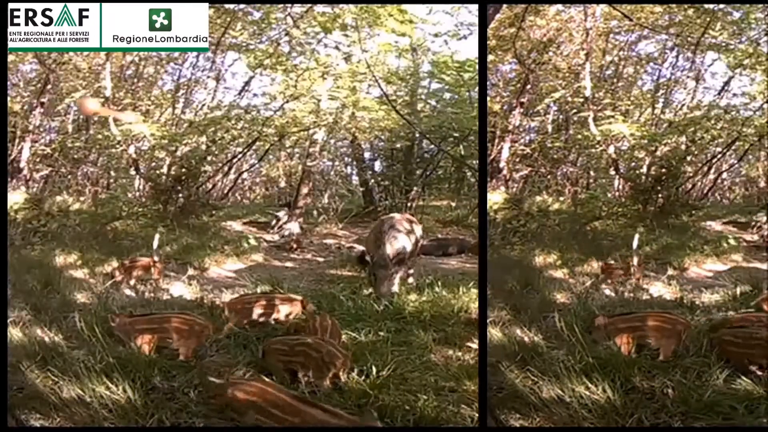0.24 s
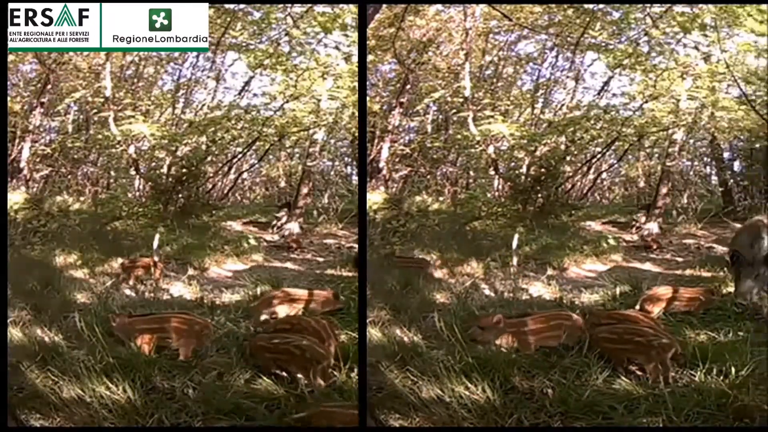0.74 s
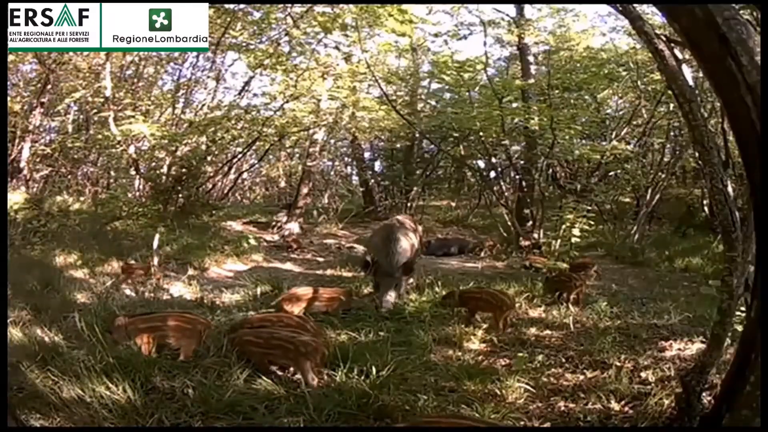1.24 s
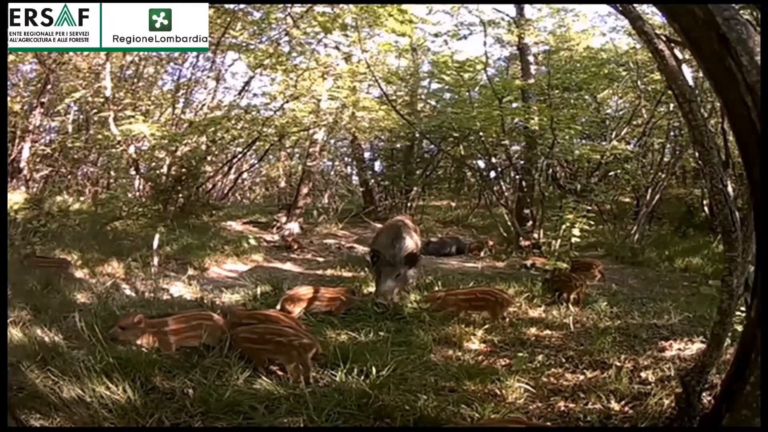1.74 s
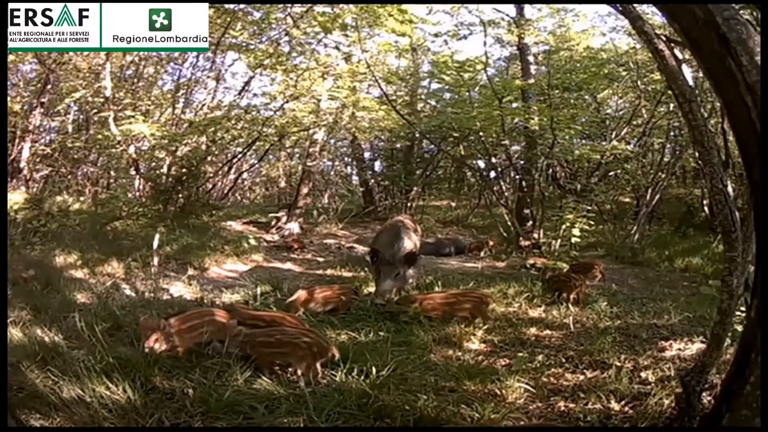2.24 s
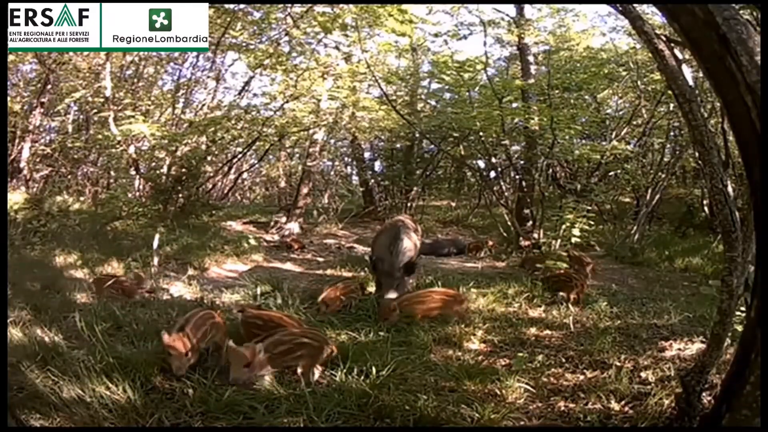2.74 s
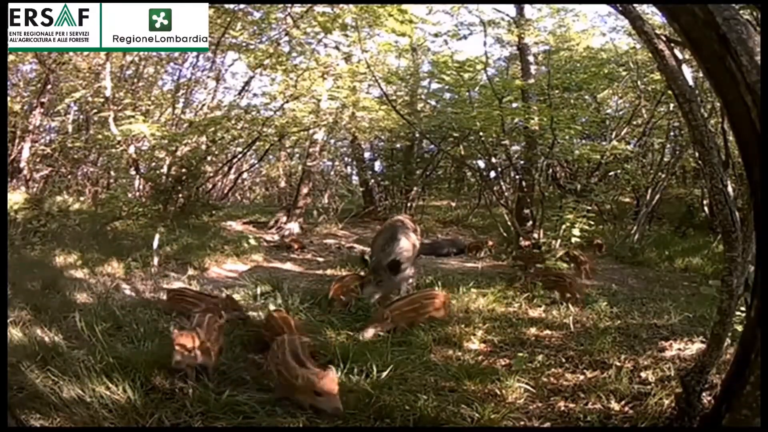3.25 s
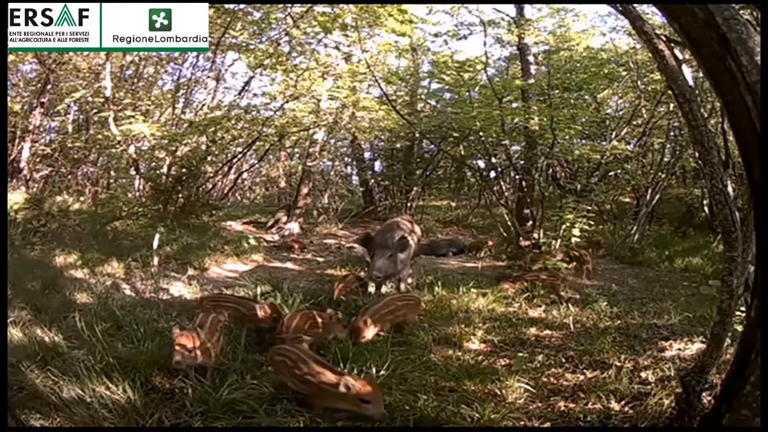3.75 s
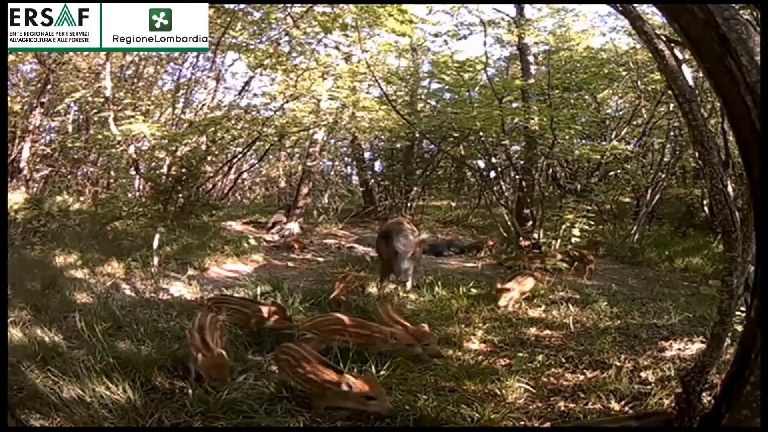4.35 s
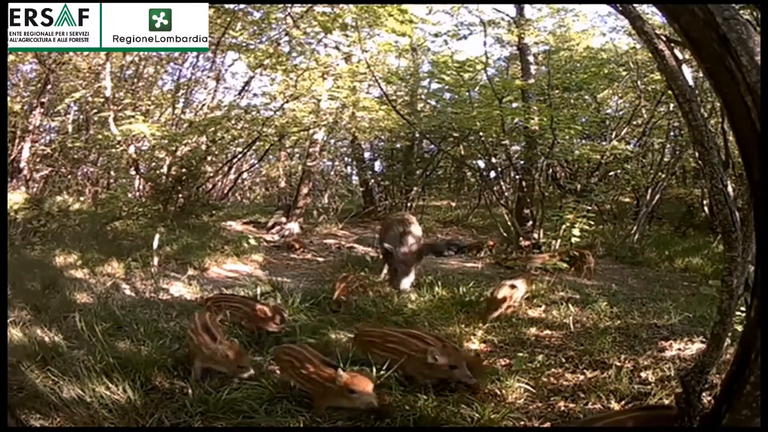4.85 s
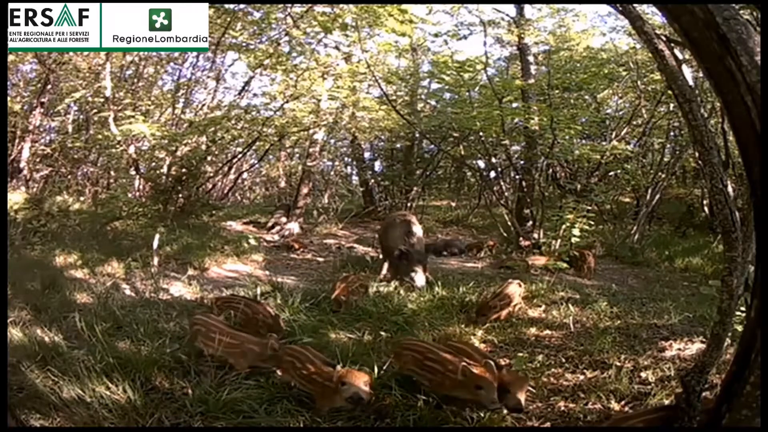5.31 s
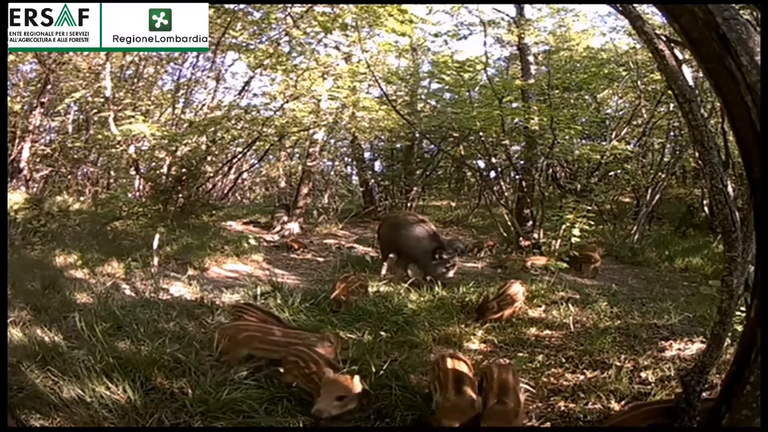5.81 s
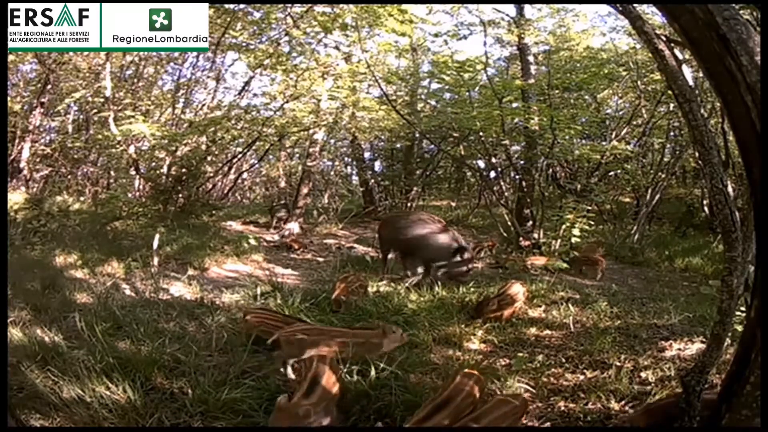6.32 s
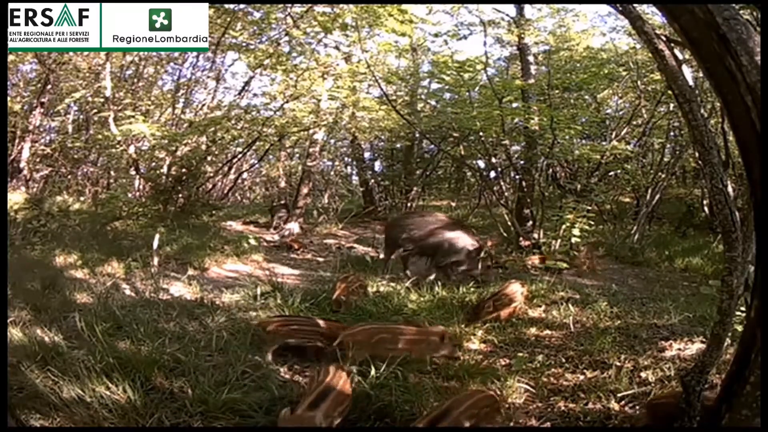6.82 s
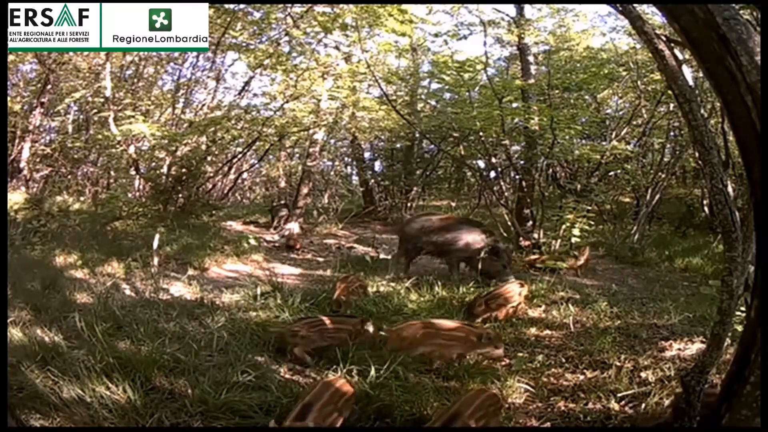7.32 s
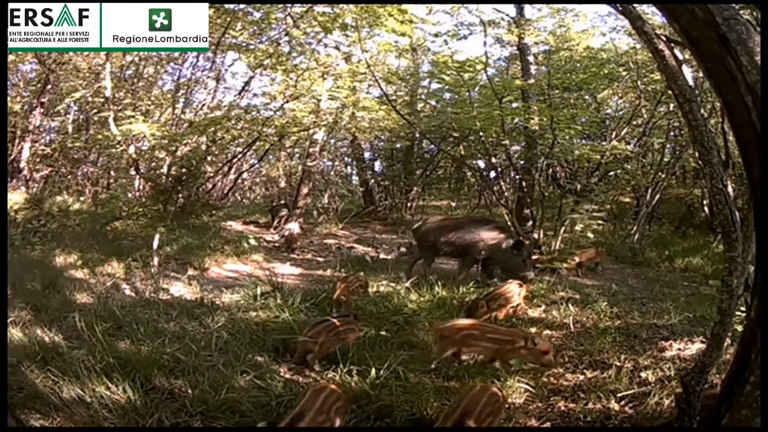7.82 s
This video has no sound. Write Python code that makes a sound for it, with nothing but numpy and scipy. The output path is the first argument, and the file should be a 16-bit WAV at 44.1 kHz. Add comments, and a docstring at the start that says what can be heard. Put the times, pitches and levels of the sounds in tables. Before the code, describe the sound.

A microphone switches on with a loud thump at about 0.1 seconds, followed by quick small ticks as a faint hiss swells in. From 0.4 seconds, wild boar piglets and a sow root through grass and dry leaves in a wood, making crisp, uneven swells of crackle with many small stalk snaps and light hoof steps. Soft, short snorts and lip smacks are scattered between 0.7 and 4.4 seconds, and the sow gives one brief low grunt at 1.3 seconds. A distant bird whistles four faint high notes from 4.5 to 4.7 seconds. The sharpest snap comes at about 4.9 seconds, with a small crunch of leaves. The rustling and snapping continue until the end at about 8 seconds, with another smack or two and a few faint snorts from 6.6 seconds. Light, low wind on the microphone lies underneath.

```python
"""In a wood, wild boar piglets and a sow root through grass and dry leaves before a small fixed camera.
The litter breaks in countless tiny impulses that merge into swells of crackle; stalks snap and ring.
Snouts snort, lips smack and the sow grunts, over faint bird notes, hiss and wind on the microphone.
The camera switches on with a thump of offset voltage, and its gain steps tick as the hiss swells back."""
import sys
import numpy as np
from scipy import signal
from scipy.io import wavfile
from scipy.ndimage import uniform_filter1d

SR = 44100
rng = np.random.default_rng(int(sys.argv[2]) if len(sys.argv) > 2 else 0)


def to_wav(sig):
    """Store sig (one row per channel, or 1-D mono) as 16-bit WAV at the path in sys.argv[1].

    Samples outside -1..1 are clipped; the rate is SR.
    """
    pcm = np.clip(np.atleast_2d(sig), -1, 1) * 32767
    pcm = np.round(pcm).astype(np.int16)
    wavfile.write(sys.argv[1], SR, pcm.T)  # frames by channels


N = 355887
T = np.arange(N) / SR
MUTE_S = .081  # a duller hiss gives way to near silence here, just before the thump
# coarse steps of the gain: their count grows with the square of time, so they crowd ever closer
COARSE_STEPS_S = .083 + np.sqrt(.008454 * (.57 + np.arange(14)))


def undb(db):
    """Decibels to amplitude ratio."""
    return 10 ** (np.asarray(db) / 20)


def unit(x):
    """Normalisation to an rms of 1."""
    return x / np.sqrt(np.mean(x ** 2))


def band(x, hz, width_hz):
    """Resonance as a fourth-order band-pass about a geometric centre."""
    low = np.sqrt(hz ** 2 + width_hz ** 2 / 4) - width_hz / 2
    edges = [low, min(low + width_hz, .45 * SR)]
    return signal.sosfilt(signal.butter(2, edges, "band", fs=SR, output="sos"), x)


def flicker(rate):
    """Random modulation of rms 1: values held for 1 / rate seconds and smoothed twice."""
    hold = int(SR / rate)
    held = np.repeat(rng.standard_normal(N // hold + 1), hold)
    return unit(uniform_filter1d(uniform_filter1d(held, hold), hold)[:N])


def add(out, start_s, sound):
    """Superposition of a short sound on a longer one."""
    i = int(start_s * SR)
    out[i:i + len(sound)] += sound[:N - i]


def crackle(rate, spread_db):
    """Poisson impulses, rate per second, with heavy-tailed sizes: most small, a few large."""
    out = 1. * (rng.random(N) < rate / SR)
    count = N // 6
    sizes = rng.standard_normal(count) * undb(spread_db * np.minimum(rng.exponential(size=count), 5))
    out[out > 0] = sizes[:int(out.sum())]
    return unit(out)


def rustle(dip_db):
    """Shot noise of cracking leaves: some impulses excite every third-octave band, others one alone."""
    # spectrum of the leaf noise: (frequency [Hz], band gain [dB])
    spectrum = [(950, -10.5), (1350, -10), (1900, -3.5), (2700, 1.5), (3600, 5), (4800, -5.5), (6500, -2),
                (8500, -1), (11000, -4.5), (13500, 3.5), (15500, -11)]
    spectrum_hz, spectrum_db = np.transpose(spectrum)
    leaf_db, litter_db, grass_db = rooting_levels()
    leaf, litter, grass = undb(leaf_db), undb(litter_db + dip_db), undb(grass_db)
    broadband = crackle(rate=3000, spread_db=1.5) * undb(.52 * flicker(56) + 1.8 * flicker(220))
    cracks = 0
    for hz in 950 * 2 ** np.arange(0, 4.1, 1 / 3):
        own = crackle(rate=4000, spread_db=2.1) * undb(2.4 * flicker(60))
        envelope = litter if hz < 4000 else grass if hz > 10000 else leaf
        colour = undb(np.interp(np.log(hz), np.log(spectrum_hz), spectrum_db))
        cracks += colour * envelope * band(broadband + .99 * own, hz, hz / 3.67)
    stem_ticks = leaf * unit(band(crackle(rate=260, spread_db=3.5), 8000, 10400))
    return (undb(5) * cracks + undb(-10.5) * stem_ticks) * undb(hoof_lift() + .54 * flicker(45))


def rooting_levels():
    """Incoherent sources add in power: envelopes in dB of leaves, heavy litter and fine grass."""
    # steady rooting of the whole group: (time [s], leaf level [dB])
    rooting = [(.17, -66), (.33, -63), (.43, -50), (.68, -59), (.95, -42.5), (1.25, -50), (1.6, -43.5),
               (2.1, -52), (2.7, -67), (3.2, -41.5), (3.45, -50), (3.7, -47.5), (4.3, -42.5), (4.72, -46.5),
               (5.1, -44), (6.2, -43), (7.45, -49), (7.9, -51)]
    # one animal shoves through the leaves: (peak time [s], leaf level [dB], rise per 10 dB [ms],
    # fall per 10 dB [ms], litter re leaves [dB], grass re leaves [dB])
    shoves = [(0.269, -50, 48, 20, -8, -2), (0.383, -40, 25, 44, -8, -5), (0.462, -38, 8.9, 12, -11, 1),
              (0.595, -38, 150, 24, -10.5, -2), (0.732, -38, 22, 76, -9, -4), (0.781, -38, 27, 10, -5, 0),
              (0.876, -39.5, 51, 11, -7, -7), (0.966, -47.5, 10, 280, -3, -2),
              (1.177, -32.5, 57, 13, -28, -2), (1.368, -36.5, 18, 55, -6, -5),
              (1.483, -37, 37, 42, -6.5, -2), (1.631, -52, 38, 24, -11, -4),
              (1.902, -34, 170, 210, -10.5, -6), (2.156, -38.5, 68, 45, -11.5, -2),
              (2.492, -40.0, 290, 140, -12, -3.5), (2.625, -45.5, 10, 76, -23, 2),
              (2.918, -38.0, 320, 19, -11.5, -3), (2.992, -33, 36, 41, -12, -4),
              (3.076, -39, 15, 12, -20, -2), (3.298, -39.5, 18, 34, -16, -2),
              (3.512, -40, 14, 230, -12.5, -6), (3.786, -36, 47, 13, -8, -13),
              (3.912, -35.5, 12, 96, -12, -2), (4.087, -42, 12, 44, -14, -1), (4.332, -39, 22, 10, -11, -7),
              (4.423, -37, 43, 53, -12, -7), (4.662, -43.5, 180, 9.3, -25, 1), (4.774, -39, 30, 15, -25, 1),
              (4.862, -34, 19, 60, -16, -1.5), (4.937, -39, 19, 110, -14, 0),
              (5.304, -38.5, 124, 42, -10.5, 0), (5.477, -35.5, 24, 26, -10.5, -3),
              (5.681, -33.5, 50, 76, -7.5, -1), (6.049, -34, 89, 15, -8.5, -6),
              (6.176, -38, 48, 60, -9.5, -1), (6.407, -42, 510, 97, -12, -5.5),
              (6.508, -39.5, 11, 11, -18, -7), (6.56, -35.5, 10, 11, -14, -5),
              (6.631, -39.5, 11, 39, -7, -6), (6.747, -37, 120, 96, -7, -4),
              (6.834, -39, 30, 200, -8.5, -5), (7.108, -37, 61, 56, -9, -4),
              (7.233, -40.5, 44, 160, -25, -12), (7.534, -36, 50, 145, -9, -5.5),
              (7.996, -40.5, 68, 25, -16, -5)]
    steady_db = np.interp(T, *np.transpose(rooting))
    power = undb(steady_db + np.array([[0], [-11.5], [-3]])) ** 2  # leaves, litter, grass
    for peak_s, db, rise_ms, fall_ms, litter_db, grass_db in shoves:
        rise, fall = rise_ms / 1000, fall_ms / 1000
        near = slice(max(int((peak_s - 4 * rise) * SR), 0), int((peak_s + 4 * fall) * SR))
        t = T[near] - peak_s
        shove_db = db - 10 * np.where(t < 0, -t / rise, t / fall)
        power[:, near] += undb(shove_db + np.array([[0], [litter_db], [grass_db]])) ** 2
    return 10 * np.log10(power)


def hoof_lift():
    """Impact of a hoof in the litter: the crackle's level in dB jumps, then falls as a half Gaussian."""
    # footfalls: (time [s], lift [dB], decay [s])
    footfalls = [(0.38, 4.5, 0.0092), (.459, 4, 0.013), (.586, 3, 0.014), (.7232, 11, 0.013),
                 (0.773, 5, 0.014), (.856, 4, .015), (1.117, 3.5, 0.0069), (1.648, 7, 0.023),
                 (2.222, 3, 0.009), (3.074, 4.5, .008), (3.908, 1, .03), (4.087, 6.5, 0.0093),
                 (4.864, 4, 0.012), (6.502, 5.5, 0.012), (7.8115, 7, .005), (7.9075, 6, 0.03),
                 (7.96, 5, .015)]
    out = np.zeros(N)
    for start, db, decay in footfalls:
        add(out, start, db * np.exp(-(T[:4000] / decay) ** 2))
    return out


def snaps():
    """Brittle fracture excites damped modes: a high ring, a deeper knock of the stem, a crumbling tail."""
    # the loudest stalks and twigs breaking:
    # (time [s], level [dB], ring frequency [Hz], ring length [cycles], knock [Hz], knock re ring [dB])
    loud_breaks = [(0.3813, -24, 9100, 1.6, 2080, -16), (0.3817, -31, 9300, 1.7, 2100, -11),
                   (0.4619, -16.5, 7400, 2.3, 3500, -17), (.5199, -22, 8900, 2, 3500, -12),
                   (0.5402, -26, 8600, 1.5, 2600, -7), (0.589, -19, 7000, 3.4, 3800, -9),
                   (0.7095, -21, 6600, 2.2, 2700, -21), (0.7239, -18, 7700, 1.5, 4100, -9),
                   (0.7269, -18, 11100, 3.8, 3600, -6), (0.731, -14, 13300, 10.0, 3600, 0),
                   (0.8406, -26, 9700, 1.9, 4100, -12), (0.857, -25, 12100, 10.0, 2500, 4),
                   (0.8724, -13.5, 8400, 1.9, 4100, -10), (1.1185, -19, 12900, 1.9, 3400, -16),
                   (1.1193, -25, 5600, 1.5, 3100, -17), (1.14, -23, 9400, 2, 3500, -14),
                   (1.1594, -22, 8400, 2, 3500, -14), (1.2482, -25, 4500, 1.5, 3380, 0),
                   (1.3197, -21, 10000, 4.3, 3000, -3), (1.3585, -25, 9400, 2, 3500, -10),
                   (1.4071, -24, 5200, 1.5, 2800, 3), (1.4162, -25, 5700, 1.5, 3500, -6),
                   (1.4602, -23, 6800, 2, 3500, -10), (1.6194, -10.5, 10000, 6, 3000, -15),
                   (1.6428, -16, 5400, 2, 3020, -6), (1.6438, -34, 6800, 1.5, 3100, -4),
                   (1.7341, -24, 12000, 3.6, 4000, 0), (1.7995, -25, 4900, 1.7, 4000, -3),
                   (2.1447, -25, 5100, 2, 3500, -12), (2.2241, -17, 10500, 3.5, 4100, -16),
                   (2.6294, -21, 8400, 6.1, 3700, -18), (2.7702, -27, 7200, 2, 3500, -14),
                   (2.898, -23, 9500, 2, 3500, -14), (2.9688, -22, 11500, 2, 3500, -14),
                   (3.0749, -15, 8900, 3.0, 4100, -11), (3.0776, -13.5, 12300, 5.2, 4100, -9),
                   (3.0786, -23, 8100, 1.7, 4100, -11), (3.0916, -28, 4500, 1.5, 4100, -4),
                   (3.1786, -22, 8600, 2.9, 2400, -18), (3.3025, -25, 8300, 2, 3500, -10),
                   (3.5021, -29, 12300, 2, 3500, -14), (3.528, -27, 6200, 2, 3500, -14),
                   (3.7817, -16, 6500, 1.5, 4100, -10), (3.7825, -20, 7900, 2.9, 4500, -6),
                   (3.7853, -29, 4730, 3.8, 4100, -10), (3.8323, -25, 8500, 2, 3600, -6),
                   (3.9103, -18, 10100, 6.1, 4100, -8), (3.9466, -14, 10700, 1.7, 4000, -23),
                   (4.0467, -23.5, 5200, 1.6, 4100, -9), (4.0888, -22, 6540, 6.0, 2100, -17),
                   (4.0895, -17, 6700, 12, 4000, -17), (4.0912, -22, 6200, 1.5, 2200, -12),
                   (4.1319, -26, 4600, 1.6, 4100, -6), (4.2304, -19, 10300, 2.8, 3500, -14),
                   (4.3039, -19, 7800, 4.5, 4100, -16), (4.3339, -21, 6100, 1.5, 4100, -6),
                   (4.3634, -25, 9600, 1.9, 3500, -11), (4.3891, -25, 7100, 2, 3500, -12),
                   (4.4215, -14, 12900, 1.5, 3200, -12), (4.4583, -21, 7100, 4.0, 4100, -10),
                   (4.653, -23, 5600, 2, 3800, -10), (4.7697, -18, 8500, 7.6, 2100, -24),
                   (4.8649, -21, 7100, 1.5, 2900, -27), (4.8655, -13, 7200, 10.0, 3100, -18),
                   (4.8711, -14, 7100, 4.0, 4100, -21), (4.8719, -5, 7600, 10, 4100, -27),
                   (4.8743, -26, 7100, 2.1, 4100, -14), (4.8752, -23, 7000, 2.2, 2900, -22),
                   (4.9335, -21, 10600, 2, 3500, -16), (5.2172, -26, 8600, 2, 3500, -14),
                   (5.2385, -18, 9000, 2, 3500, -14), (5.2595, -18, 11000, 2, 3500, -14),
                   (5.3305, -23, 11000, 1.9, 4100, -11), (5.3416, -26, 6300, 1.6, 4100, -14),
                   (5.5454, -24, 4500, 1.6, 4080, -2), (5.7256, -22, 9500, 2.3, 3200, -9),
                   (5.7431, -19, 9600, 7.8, 3800, -11), (5.8037, -15, 11100, 2.5, 4000, -8),
                   (5.835, -19, 6500, 2, 2800, -2), (5.9254, -19, 13500, 4.4, 4130, -4),
                   (5.935, -22, 13500, 3, 4000, -14), (6.03, -17, 6300, 2.5, 2800, -15),
                   (6.3297, -17.5, 5400, 2.3, 4100, -9), (6.393, -20.5, 6530, 5.3, 4100, -19),
                   (6.5043, -27, 6300, 2, 3500, -10), (6.6392, -17, 6900, 1.9, 4100, -6),
                   (6.6626, -23, 11200, 2.6, 3100, 2), (6.8295, -26, 8500, 2, 3500, -12),
                   (6.941, -17, 10200, 2.1, 3400, -11), (7.1377, -18, 7800, 1.5, 3200, -19),
                   (7.2358, -20, 7100, 3.6, 4100, -15), (7.2593, -22, 7100, 9.1, 3600, -20),
                   (7.6099, -20, 6300, 1.8, 2900, -19), (7.6109, -16, 6200, 2.3, 3000, -18),
                   (7.7304, -18, 10800, 4.5, 3700, -19), (7.812, -24, 7320, 3.6, 3200, -9),
                   (7.9081, -31, 4470, 10.0, 4100, -2), (7.9603, -21, 5700, 2, 3600, -3),
                   (7.9961, -18, 8000, 6.8, 3900, 0), (7.9976, -25, 6600, 2.4, 4100, -1),
                   (8.0178, -17.5, 6800, 3.7, 4100, -21), (8.0535, -22.5, 7400, 1.6, 4100, -16)]
    small_times = rng.uniform(.5, T[-1], 50)
    small_breaks = [(start, rng.normal(-27, 2), 8500 * 2 ** rng.normal(0, .25), 2.5, 3200, -10.5)
                    for start in small_times]
    out, t = np.zeros(N), T[:900]
    for start, db, hz, cycles, knock_hz, knock_db in loud_breaks + small_breaks:
        turns = t * hz
        ring = np.sin(2 * np.pi * turns) * (1 - np.exp(-turns / .6)) * np.exp(-3 * turns / cycles)
        ring /= np.abs(ring).max()
        knock = undb(knock_db) * np.sin(2 * np.pi * knock_hz * t) * np.exp(-t * knock_hz / 1.04)
        crumbs = .15 * band(rng.standard_normal(len(t)), hz, 1.3 * hz) * np.exp(-t / .003)
        add(out, start - .00012, undb(db - 4.5) * (ring + knock + crumbs))
    return signal.sosfilt(signal.butter(2, 1700, "high", fs=SR, output="sos"), out)


def crunches():
    """A sudden, dense train of cracks drives the resonance of one size of leaf."""
    # bunches of dry leaves crushed: (time [s], length [s], level [dB], resonance [Hz], bandwidth [Hz])
    bunches = [(0.766, 0.022, -42, 4240, 2500), (1.84, 0.05, -42, 7600, 1200),
               (1.886, 0.03, -39, 5440, 1200), (1.89, 0.017, -39, 7540, 1400),
               (1.927, 0.018, -45, 5200, 800), (2.985, 0.037, -47, 4360, 1200),
               (3.298, .008, -49.5, 3430, 900), (4.866, .018, -34, 7400, 1300),
               (4.877, 0.03, -39, 7800, 1800), (5.631, 0.024, -41, 5900, 1200),
               (5.69, .022, -38, 5970, 1300), (6.006, 0.011, -43, 6350, 900), (6.02, .022, -40, 6300, 1000),
               (7.81, .003, -47, 3280, 1500), (7.91, .008, -47, 4450, 900), (7.93, .014, -46.5, 7050, 1200)]
    out, cracks = np.zeros(N), crackle(rate=2000, spread_db=.5)
    for start, length, db, hz, width_hz in bunches:
        near = slice(int(start * SR), int((start + length + .01) * SR))
        envelope = np.interp(T[near] - start, [0, .001, .7 * length, length], [0, 1, .8, 0])
        out[near] += undb(db) * unit(band(cracks[near] * envelope, hz, width_hz))
    return out


def snorts():
    """Flutter in the nose modulates the amplitude of a snout resonance and its breath noise."""
    # snorts and low grunts:
    # (time [s], level [dB], resonance [Hz], length [s], breathiness [0-1], flutter [Hz])
    breaths = [(0.944, -43, 326, 0.056, 0, 55), (1.083, -51, 219, 0.055, 0.07, 63),
               (1.218, -52, 342, 0.064, 0.1, 67), (1.385, -56, 230, 0.028, .2, 60),
               (1.753, -55, 295, 0.048, 0.04, 33), (1.86, -57, 199, 0.046, 0.25, 67),
               (1.91, -50.5, 338, 0.048, 0, 42), (1.976, -56, 269, 0.048, 0.2, 60),
               (1.804, -52, 338, 0.055, 0.2, 64), (1.881, -50.5, 324, 0.036, 0.37, 79),
               (2.245, -47, 333, 0.036, 0.1, 85), (2.277, -44, 362, 0.024, 0, 19),
               (2.436, -51.5, 702, 0.023, 0.46, 85), (2.54, -56, 297, 0.028, 0, 78),
               (3.488, -41.5, 497, 0.011, 0.06, 98), (3.652, -51, 625, 0.035, 0.26, 70.5),
               (6.645, -56, 330, 0.05, 0.3, 10), (6.7, -55, 300, .045, 0.4, 12),
               (6.95, -55, 340, .055, 0, 10), (7.18, -58, 280, .05, .2, 10),
               (7.185, -56, 570, 0.055, .2, 8.8), (7.666, -56, 310, .04, 0, 40),
               (7.862, -58, 634, .04, 0, 36), (7.872, -53, 300, 0.045, 0.2, 11)]
    out, t = np.zeros(N), T[:6000]
    for start, db, hz, length, breathiness, flutter_hz in breaths:
        air = band(rng.standard_normal(len(t)), 1.05 * hz, .9 * hz)
        air = unit(band(air, 1.05 * hz, .9 * hz))
        tone = np.sin(2 * np.pi * hz * t) + 2 * breathiness * air
        flutter = 1 + .7 * np.cos(2 * np.pi * flutter_hz * t)
        envelope = np.sin(np.pi * np.clip(t / length, 0, 1) ** 1.2)
        add(out, start, undb(db) * tone * flutter * envelope)
    return out


def smacks():
    """Impulse response of the mouth cavity: each lip smack rings it twice in quick succession."""
    # lip smacks:
    # (time [s], level [dB], resonance [Hz], 60 dB decay [s], second pop's lag [s], its trim [dB])
    lip_smacks = [(0.728, -45, 1870, 0.018, 0.0044, -1.5), (1.298, -40, 880, 0.04, 0.00453, -4),
                  (1.712, -33, 1246, 0.024, 0.0051, -5), (1.882, -47, 1210, .025, 0.0073, 0),
                  (2.655, -43, 1300, 0.0091, 0.0029, 4), (2.861, -43, 1280, 0.02, 0.0045, -1),
                  (3.953, -43, 1320, 0.014, 0.0053, 0), (3.982, -39, 1300, 0.0093, 0.0053, 5),
                  (4.226, -32, 1284, 0.021, 0.0051, -12), (4.404, -40.5, 1110, 0.02, 0.005, -5),
                  (5.823, -41, 1710, 0.018, 0.005, -5), (6.558, -40, 1110, 0.018, 0.005, -6)]
    out, t = np.zeros(N), T[:6000]
    for start, db, hz, t60, lag, trim_db in lip_smacks:
        spit = .27 * unit(band(rng.standard_normal(len(t)), hz, .27 * hz))
        envelope = (1 - np.exp(-t / .0011)) * undb(-60 * t / t60)
        pop = (np.sin(2 * np.pi * hz * t) + spit) * envelope
        add(out, start, undb(db + 1) * pop)
        add(out, start + lag, undb(db + 5 + trim_db) * pop)
    return out


def grunt(start_s=1.308, length_s=.057, glide_hz=(199.6, 140), roughness=.6):
    """Source and filter: the sow's vocal pulses fall in pitch, and her upper formants fade first."""
    # throat resonances: (frequency [Hz], bandwidth [Hz], level [dB])
    formants = [(160, 81, -5.5), (330, 170, 0.5), (640, 240, 0), (850, 120, -10)]
    out, t = np.zeros(N), T[:4000]
    progress = np.clip(t / length_s, 0, 1)
    turns = np.cumsum(np.interp(progress ** .45, [0, 1], glide_hz)) / SR
    pulses = unit(np.diff(np.floor(turns), prepend=0)) + roughness * rng.standard_normal(len(t))
    dulling = np.maximum(t - .02, 0) / .03
    voice = sum(undb(db) * unit(band(pulses, hz, width_hz)) * np.exp(-dulling * hz / 330)
                for hz, width_hz, db in formants)
    envelope = np.sin(np.pi * progress ** .63) ** .5
    add(out, start_s, undb(-39.5) * voice * envelope)
    return out


def wind():
    """Gusts on the microphone: slow pressure fluctuations, mostly below the range of pitch."""
    # wind pressure: (time [s], level [dB])
    strength = [(.6, -47.5), (.95, -55.5), (1.41, -56), (1.54, -44), (2.03, -53), (2.37, -54), (2.5, -56),
                (2.97, -48.5), (3.45, -53.5), (3.84, -50), (4.02, -61), (4.16, -50), (4.5, -55.5),
                (4.65, -49), (4.8, -59), (5.05, -45), (5.32, -43), (5.55, -46), (5.7, -55), (6.3, -50.5),
                (6.92, -59.5), (7.3, -58), (8.07, -60)]
    pressure = band(rng.standard_normal(N), 14.2, 11.7)
    pressure = unit(band(pressure, 11, 82))
    gust_db = 3 * flicker(5.08)
    return pressure * undb(np.interp(T, *np.transpose(strength)) + gust_db)


def bird():
    """Far whistles: nearly pure tones that glide in frequency and waver in amplitude."""
    # notes: (start [s], end [s], first frequency [Hz], last frequency [Hz], level [dB])
    notes = [(0.005, 0.085, 5400, 5350, -56.5), (4.518, 4.556, 4800, 4900, -53),
             (4.57, 4.616, 4990, 4880, -46), (4.625, 4.672, 4830, 5020, -48.5),
             (4.692, 4.74, 4870, 5020, -54)]
    out, waver = np.zeros(N), undb(3 * flicker(150))
    for start, end, first_hz, last_hz, db in notes:
        envelope = np.interp(T, [start, start + .012, end - .012, end], [0, 1, 1, 0])
        hz = np.interp(T, [start, end], [first_hz, last_hz])
        out += undb(db) * envelope * np.sin(2 * np.pi * np.cumsum(hz) / SR)
    return out * waver


def hiss(dip_db):
    """Noise floor: a faint background hiss whose bands flicker in level, together and alone."""
    # spectrum of the hiss: (frequency [Hz], relative spectral density [dB])
    spectrum = [(24, -32), (40, -4), (64, -12), (143, -15), (535, -19), (1450, -22.5), (4920, -19),
                (9890, -19.5), (13700, -18), (15500, -29)]
    spectrum_hz, spectrum_db = np.transpose(spectrum)
    out, swell, bass_bumps = 0, flicker(25), flicker(18)
    for hz in 45 * 2 ** np.arange(0, 8.6, .5):
        db = np.interp(np.log(hz), np.log(spectrum_hz), spectrum_db)
        db += 1.26 * swell + 2.45 * flicker(14) + 3.1 * (hz < 150) * bass_bumps
        db -= 4 * np.log2(hz / 500) * (T < MUTE_S)  # duller at first
        dip_scale = np.interp(np.log(hz), np.log([120, 400, 2500, 7000]), [.038, 2, 6.3, .42])
        out += undb(db + dip_scale * dip_db) * band(rng.standard_normal(N), hz, hz / 3)
    # near silence before the thump, then a climb during the gain steps
    times = [MUTE_S, MUTE_S + .003, .11, COARSE_STEPS_S[1], COARSE_STEPS_S[-1]]
    return unit(out) * undb(-47 + np.interp(T, times, [3, -24, -16, -18, 0]))


def dips():
    """Amplitude modulation in dB: brief drops in the level of the low and middle noise bands."""
    # flat-bottomed dips: (centre time [s], nominal depth [dB], length [s])
    level_dips = [(0.91, 4.5, 0.025), (1.014, 7, 0.018), (1.17, 19, .037), (1.438, 3, 0.026),
                  (1.591, 4.5, 0.036), (1.781, 9, .015), (1.823, 10, 0.019), (1.848, 12, 0.018),
                  (1.933, 11, 0.013), (2.196, 9, 0.039), (2.304, 4, 0.035), (2.416, 4, 0.016),
                  (2.528, 6, 0.017), (2.576, 10, 0.048), (2.7, 3, 0.022), (2.75, 3, .016),
                  (2.827, 4, 0.015), (2.951, 4, .016), (3.193, 4.5, 0.035), (3.25, 6, 0.021),
                  (3.315, 8, 0.026), (3.523, 8, 0.035), (3.722, 12, 0.012), (4.026, 6, 0.011),
                  (4.536, 6, 0.019), (4.618, 2, .016), (4.748, 3, 0.022), (4.896, 8, 0.025),
                  (5.106, 3, .025), (5.515, 9, 0.022), (5.636, 2, 0.016), (5.878, 3.5, 0.028),
                  (6.093, 4.5, 0.024), (6.181, 8, 0.017), (6.26, 4.5, 0.017), (6.406, 4, 0.021),
                  (7.89, 2, 0.028), (6.953, 5, 0.04), (7.027, 3, 0.022), (7.491, 5, 0.057),
                  (7.664, 11, 0.049)]
    out, t = np.zeros(N), T[:8820] - .1
    for centre, db, length in level_dips:
        add(out, centre - .1, -db * np.exp(-.5 * (t / (.39 * length)) ** 4))
    return out


def scene():
    """Superposition of animals, wind and hiss in one channel."""
    dip_db = dips()
    undergrowth = rustle(dip_db) + snaps() + crunches()
    voices = snorts() + smacks() + grunt()
    return (undergrowth + voices + hiss(dip_db) + wind() + bird())[None]


def gain_ripple(step_db=.5, switch_s=.00055):
    """Quantisation error of a stepped gain, in dB: the sawtooth by which it departs from a smooth climb."""
    count = len(COARSE_STEPS_S)
    step_times = np.interp(np.arange(0, count - .9, 1 / 3), np.arange(count), COARSE_STEPS_S)
    index = np.arange(len(step_times))
    is_fine = index % 3 > 0  # two unevenly timed fine steps between coarse ones
    step_times += .0012 * rng.standard_normal(len(index)) * is_fine
    stage = np.interp(T, step_times, index)
    ripple = step_db * (np.floor(stage) - stage + .5 * (stage % 1 > 0))
    for coarse_s in COARSE_STEPS_S[1:-2]:  # the fine stage drops back just before a coarse step
        ripple[(T > coarse_s - switch_s) & (T <= coarse_s)] -= 2 * step_db
    # early in the climb the edges are blunt and the gain is unsteady
    early = np.interp(T, [.228, .24], [1, 0])
    ripple = early * uniform_filter1d(ripple, size=36) + (1 - early) * uniform_filter1d(ripple, size=4)
    jitter_db = np.interp(T, [.16, .2, .228, .25, .42, .5], [.012, .09, .1, .029, .052, .011])
    ripple += jitter_db * unit(band(rng.standard_normal(N), 650, 820))
    ripple[(T > .1151) & (T <= .1151 + switch_s)] += 1.17  # overshoot just after the thump
    return ripple


def record(dry):
    """Switch-on transient: a voltage offset thumps, gain steps chop it and the sound, the top is cut."""
    # offset voltage at the camera's output: (time [s], offset [full scale])
    transient = [(0, .01), (.1101, 0), (.1107, -.11), (.1113, -.03), (.1128, .565), (.125, .555),
                 (.143, .415), (.17, .335), (.198, .335), (.235, .245), (.39, .135), (.46, .027),
                 (.8, .011), (8.07, .009)]
    offset = uniform_filter1d(np.interp(T, *np.transpose(transient)), size=15)
    stepped = (dry + offset) * undb(gain_ripple())
    return signal.sosfilt(signal.ellip(14, .2, 90, 15780, fs=SR, output="sos"), stepped)


dry = scene()
out = record(dry)
to_wav(out)
```